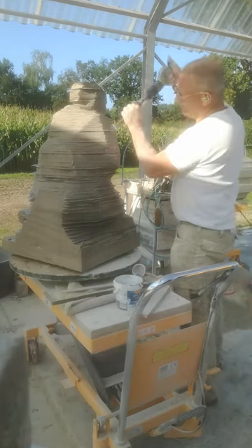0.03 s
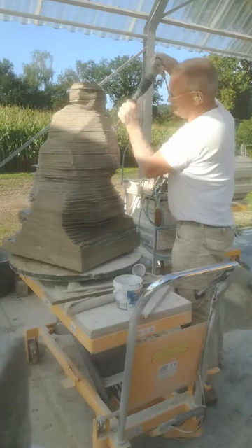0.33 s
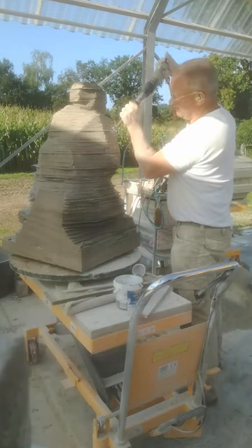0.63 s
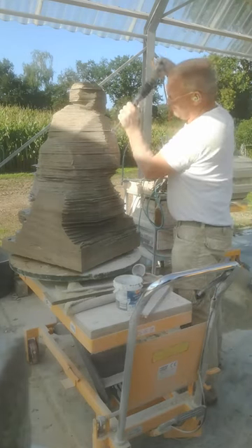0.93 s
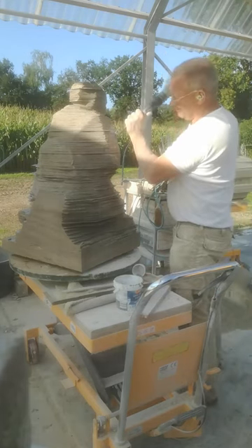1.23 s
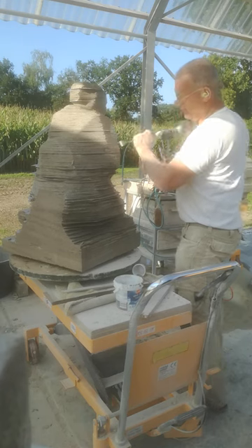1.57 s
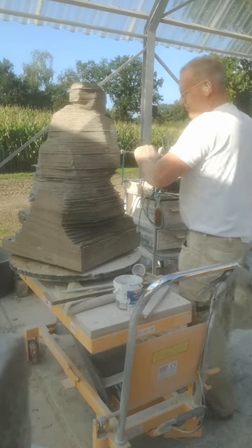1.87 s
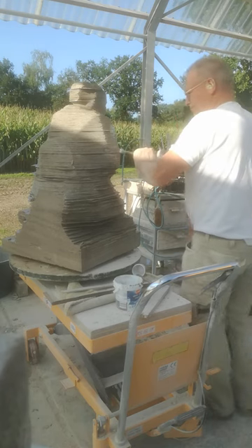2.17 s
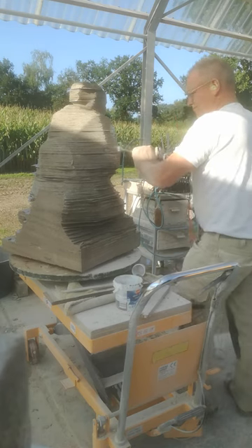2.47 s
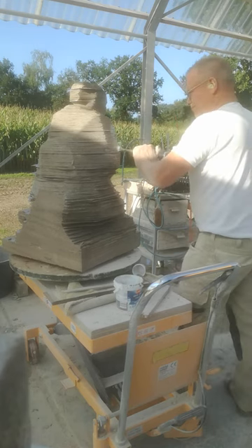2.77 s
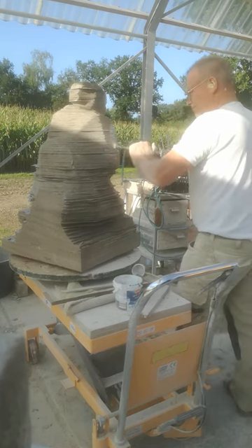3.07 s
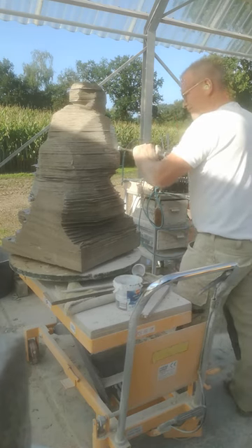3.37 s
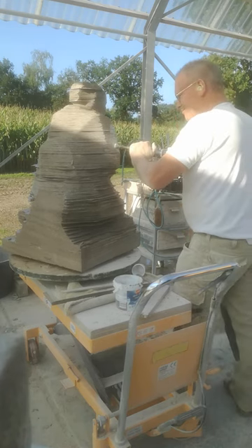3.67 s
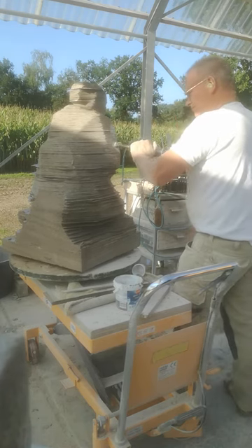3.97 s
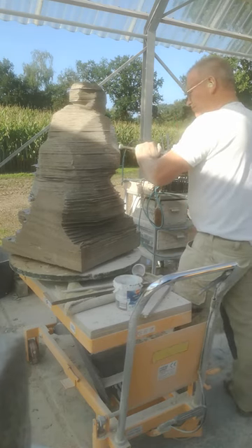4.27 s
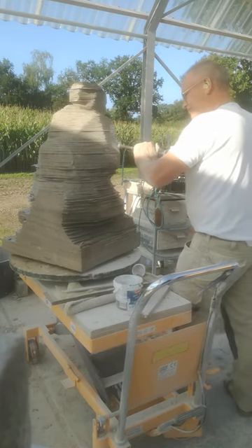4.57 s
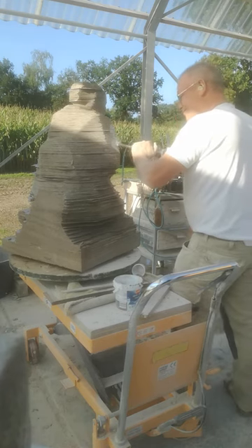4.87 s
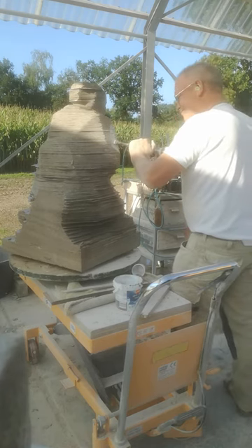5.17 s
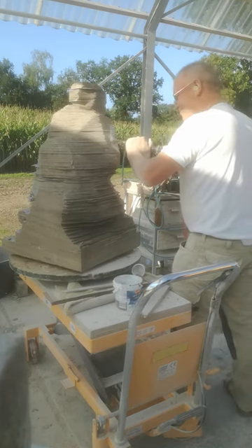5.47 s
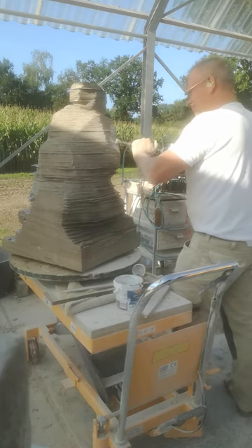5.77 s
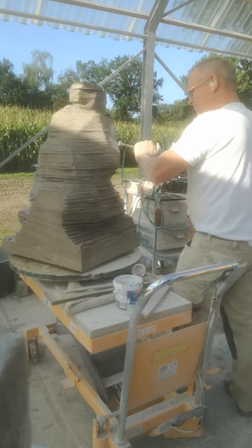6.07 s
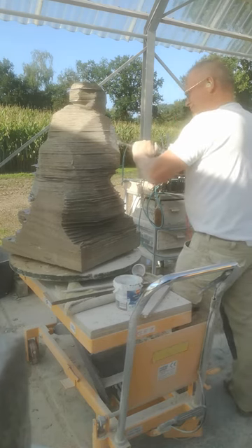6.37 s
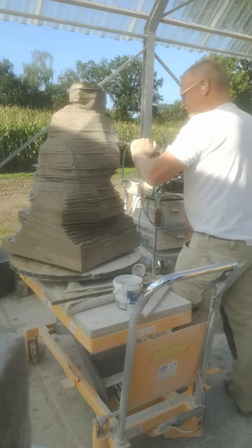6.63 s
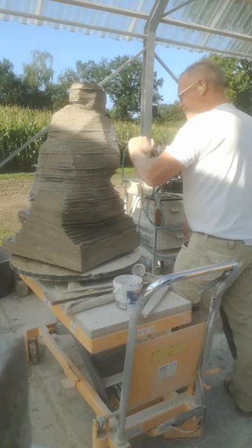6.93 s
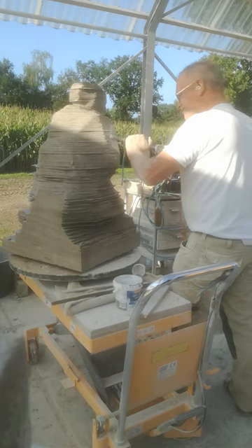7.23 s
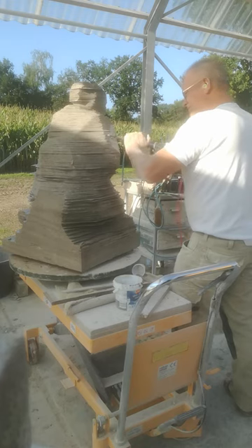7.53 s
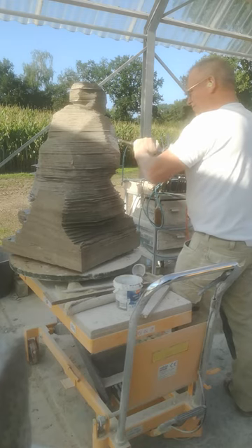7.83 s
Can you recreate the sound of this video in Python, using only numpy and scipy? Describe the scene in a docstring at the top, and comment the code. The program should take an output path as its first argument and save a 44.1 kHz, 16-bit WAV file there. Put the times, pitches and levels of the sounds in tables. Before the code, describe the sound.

A pneumatic chisel hammers stone in rapid, rattling bursts. Bright gritty cracks and a thin steel ring ride on a low thudding buzz, with hiss and a high whistle from the exhaust. Early short bursts give way to a few loose ringing taps and a pause, then longer runs follow, slowing as each ends. The tool is nearby on the right, with short reflections from an open-sided shelter in a quiet yard.

```python
"""Under an open-sided roof in a quiet yard, a sculptor dresses stone with a pneumatic chisel, in bursts.
At full speed the piston strikes about 42 times a second: the stone cracks, the steel rings, and the
exhaust lets out a thump, a hiss and a short whistle. As the hand eases, the piston slows and the chisel
rings longer. The tool is to the right of a spaced microphone pair, with the shelter reflecting it."""
import sys
import numpy as np
from scipy import signal
from scipy.fft import rfft, irfft
from scipy.io import wavfile
from scipy.ndimage import uniform_filter1d

SR = 44100
rng = np.random.default_rng(int(sys.argv[2]) if len(sys.argv) > 2 else 0)


def wrap_up_sound(samples):
    """Save the sound to the file named by the first command line argument, as 16-bit audio."""
    columns = np.atleast_2d(samples).T
    # keep every value between -1 and 1, then stretch to whole-number steps
    tamed = np.clip(columns, -1, 1)
    steps = np.round(tamed * 32767).astype(np.int16)
    wavfile.write(sys.argv[1], SR, steps)


N = 348390
TIME, FREQS = np.arange(N) / SR, np.fft.rfftfreq(N, 1 / SR)
FULL_RATE, IDLE_RATE, LOOSE_RATE = 42.5, 17, 28  # strokes per s

# Piston speed through each burst, first blow to last: time_s, strokes_per_s
BURST_1 = [(0.099, 25.45), (0.19, 39.96), (0.358, 43.73), (0.498, 41.76), (0.549, 36.71), (0.617, 22.59)]
BURST_2 = [(0.685, 18.19), (0.752, 40.67), (0.801, 41.19), (0.92, 43.29), (0.991, 41.93), (1.073, 30.85)]
BURST_3 = [(1.805, 21.94), (1.851, 21.89), (1.899, 19.3), (2.09, 33.11), (2.232, 37.12), (2.381, 43.14),
           (2.452, 42.95), (2.638, 32.29)]
BURST_4 = [(2.666, 37.54), (2.767, 41.95), (3.001, 43.53), (3.112, 28.9)]
BURST_5 = [(3.207, 28.59), (3.234, 42.51), (3.776, 42.44), (3.8, 43.06), (3.848, 39.46), (3.95, 19.18),
           (4.0, 20.91), (4.101, 18.92)]
BURST_6 = [(4.268, 7.97), (4.331, 23.81), (4.365, 35.19), (4.471, 40.18), (4.616, 42.6), (4.639, 42.24),
           (5.489, 42.47), (5.585, 41.47), (5.679, 21.97)]
BURST_7 = [(6.037, 17.5), (6.124, 28.97), (6.154, 34.65), (6.341, 40.33), (6.437, 42.56), (6.791, 42.26),
           (7.428, 42.57), (7.453, 40.16), (7.55, 20.93)]
BURSTS = [BURST_1, BURST_2, BURST_3, BURST_4, BURST_5, BURST_6, BURST_7]


def amp(db):
    """Decibels to gain."""
    return 10 ** (np.asarray(db) / 20)


def unit_rms(x):
    """Scales to rms 1."""
    return x / np.sqrt(np.mean(x ** 2) + 1e-20)


def curve_at(points, hz):
    """Reads a curve on a log-frequency axis."""
    point_hz, value = np.transpose(points)
    return np.interp(np.log(hz + 1), np.log(point_hz), value)


def rate_at(burst, t):
    """Strokes per second at the times t."""
    return np.interp(t, *np.transpose(burst))


def equalise(x, eq):
    """Filters by an EQ curve."""
    return irfft(rfft(x) * amp(curve_at(eq, FREQS)), N)


def noise(eq):
    """Noise of rms 1, shaped by an EQ curve."""
    return unit_rms(equalise(rng.standard_normal(N), eq))


def clicks(times, sizes):
    """One impulse at each time."""
    return np.bincount(np.clip(np.round(times * SR).astype(int), 0, N - 1), sizes, N)


def convolve(x, response):
    """Convolves and keeps the scene's length."""
    return signal.oaconvolve(x, response)[:N]


def add(mix, start_s, sound):
    """Mixes a sound in at start_s."""
    part = mix[max(round(start_s * SR), 0):][:len(sound)]
    part += sound[:len(part)]


def strokes():
    """Time and rate of each piston stroke: one blow for every whole turn of the cycle."""
    rows = []
    for burst in BURSTS:
        t = np.arange(burst[0][0], burst[-1][0] + .01, 1 / SR)
        rate = rate_at(burst, t)
        turns = np.floor(np.cumsum(rate) / SR)
        hit = np.diff(turns, prepend=-1) > 0
        rows.append([t[hit], rate[hit]])
    times, rates = np.hstack(rows)
    return times + .0002 + .00012 * rng.standard_normal(len(times)), rates


def performance(t, rates, open_db_per_s=904.5, shut_db_per_s=378.5, seat_db_per_s=229):
    """Levels and whistle pitch at the times t, following the sculptor's grip and the piston's speed."""
    # Each grip on the tool, with relative levels at full speed: air_on_s, seated_s, eases_s, air_off_s,
    # air_db, thump_db, first_bite_db, last_bite_db, first_ring_db, last_ring_db, whistle_db, whistle_hz
    grips = [(0.052, 0.135, 0.55, 0.58, -38, -41.5, -34.5, -44.5, -30.5, -33.5, -23, 7760),
             (0.656, 0.726, 1.1, 1.068, -38.5, -43, -39.5, -41, -36.5, -29, -24.5, 8120),
             (1.3, 1.303, 1.36, 1.4, -42, -44.5, -46, -46, -34, -33, -36, 8300),
             (1.776, 1.8, 1.8, 2.07, -42.5, -48, -66, -49.5, -48, -42, -35, 7900),
             (1.956, 1.98, 2.9, 2.5, -40.5, -43.5, -49.5, -39.5, -42.5, -37, -32.5, 6340),
             (2.62, 2.62, 3.3, 3.143, -40, -45.5, -41.5, -45.5, -40, -35.5, -28.5, 7860),
             (3.199, 3.24, 3.8, 3.96, -41, -45, -43, -39.5, -42.5, -36, -28.5, 7930),
             (3.9, 3.93, 4.6, 4.11, -38, -45, -46, -48.5, -44, -47.5, -30.5, 8000),
             (4.25, 4.347, 5.57, 5.65, -39.5, -45, -45, -41.5, -44.5, -36, -26.5, 7750),
             (6.049, 6.116, 8.5, 7.55, -39.5, -45, -43.5, -41, -43, -33, -28, 7750)]
    grips = np.array(grips)
    throttle_db = np.minimum((t - grips[:, :1]) * open_db_per_s, (grips[:, 3:4] - t) * shut_db_per_s)
    open_db = np.minimum(throttle_db.max(0), 0)
    (on_s, seated_s, eases_s, off_s, air_db, thump_db, first_bite_db, last_bite_db,
     first_ring_db, last_ring_db, whistle_db, whistle_hz) = grips[throttle_db.argmax(0)].T
    progress = np.clip((t - on_s) / (off_s - on_s), 0, 1)
    rates = np.maximum(rates, IDLE_RATE)

    def slow_loss(spin_up_db, easing_db):
        """Level lost to a slow piston: this many dB each time the rate halves."""
        return np.log2(FULL_RATE / rates) * np.where(t < eases_s, spin_up_db, easing_db)

    seat_db = np.minimum(t - seated_s, 0) * seat_db_per_s  # blows fall short until the chisel is seated
    boom_db = 3 * np.exp(-((rates - 37.1) / 2.96) ** 2)  # the body booms near 37 strokes per s
    swell_db = 5.5 * (np.sin(np.pi * progress) - 1)  # the whistle swells in mid-cut
    squeak_db = 5.5 * (t < seated_s)  # and squeaks on the first puffs
    bite_db = first_bite_db + (last_bite_db - first_bite_db) * progress
    ring_db = first_ring_db + (last_ring_db - first_ring_db) * progress ** 1.3
    return dict(air_db=air_db + open_db - slow_loss(5.5, 5),
                thump_db=thump_db + open_db + seat_db + boom_db - slow_loss(5.5, 5.5),
                bite_db=bite_db + seat_db - slow_loss(1.5, 2.5),
                ring_db=ring_db + seat_db - slow_loss(1.5, 3),
                whistle_db=whistle_db + open_db + swell_db + squeak_db - slow_loss(10, 32.5),
                whistle_hz=np.maximum(whistle_hz * (rates / FULL_RATE) ** .75, 4960))


def yard_ambience(gain_db=-80):
    """A faint, low bed of outdoor noise, mostly common to both microphones."""
    # Tone of the yard: freq_hz, level_db
    yard_eq = [(25, -3), (90, 3.5), (160, 6.5), (300, -11.5), (700, -11.5), (1600, -24.5), (4000, -15),
               (9000, -17), (16000, -18.5)]
    return amp(gain_db) * (noise(yard_eq) + .5 * np.array([noise(yard_eq), noise(yard_eq)]))


def air_hiss(times, air_db, leak_limit_db=-50, puff_s=0.0084, gain_db=1):
    """A small flow only leaks past the piston; a larger one leaves the exhaust in puffs."""
    # Peaky hiss of the leak: freq_hz, level_db
    leak_eq = [(100, 8.5), (250, 16.5), (560, -5), (740, 15), (950, 1.5), (1250, 9), (2200, -25),
               (3100, 6.5), (4300, -15), (5800, 11), (7900, -10), (9000, 12.5), (11000, -12.5),
               (16000, -29)]
    # Broad hiss of the exhaust: freq_hz, level_db
    exhaust_eq = [(30, -30), (100, -23), (220, -6.5), (500, -11), (900, -12), (1600, -4), (2200, -6),
                  (3000, -2), (3900, 0), (4800, -2.5), (6800, 1), (9500, -3), (12000, -4), (16000, -21.5)]
    t = np.arange(2048) / SR
    puff = t / puff_s * np.exp(1 - t / puff_s) ** 2
    pulsing = 1 + convolve(clicks(times, np.ones(len(times))), puff)
    flow, limit = amp(air_db), amp(leak_limit_db)
    leak_share = limit / np.hypot(flow, limit)
    leak = leak_share * noise(leak_eq)
    exhaust = (1 - leak_share) * pulsing * noise(exhaust_eq)
    return amp(gain_db) * flow * (leak + exhaust)


def valve_putter(times, air_db, rates, pitch_hz=745, t60_s=0.03, open_db=-49, gain_db=-34, lead_s=.024):
    """A hollow putter as the piston draws back before every stroke, strongest when it idles."""
    t = np.arange(3000) / SR
    envelope = amp(-60 * t / t60_s) * (1 - np.exp(-t / 0.00033))
    pop = envelope * np.sin(2 * np.pi * pitch_hz * t)
    late_s = 0.0027 * rng.random(len(times))
    sizes = amp(np.minimum(air_db - open_db, 0)) * np.minimum(22 / rates, 1) ** 3
    return amp(gain_db) * convolve(clicks(times - lead_s + late_s, sizes), pop)


def stone_crack(times, bite_db, crack_s=0.0011, crumble_s=0.0074, crumble_db=-13, knock_db=-11, gain_db=24):
    """Each blow is a knock that is always alike, a fresh crack, and a short crumbling of grit."""
    # Bright snap of breaking stone: freq_hz, level_db
    crack_eq = [(150, -41), (700, -9.5), (1800, -11), (3000, -2.5), (4600, -2), (5600, 6), (7000, 8),
                (9000, 1.5), (12000, -8), (13200, -3), (16000, -10.5)]
    t = np.arange(2048) / SR
    blows = clicks(times, amp(bite_db))
    crack = np.sqrt(t / crack_s) * np.exp(.5 - t / crack_s)
    crumble = amp(crumble_db) * np.exp(-t / crumble_s)
    fracture = convolve(blows, crack + crumble) * rng.standard_normal(N)
    knock = convolve(blows, crack * rng.standard_normal(len(t)))
    return amp(gain_db) * equalise(fracture + amp(knock_db) * knock, crack_eq)


def steel_ring(times, ring_db, looseness, pressed_hz=10900, free_hz=10810,
               pressed_s=0.00079, free_s=0.012, rebound_gain=0.028, gain_db=-3):
    """The chisel's lengthwise mode: damped when pressed on the stone, lower and longer when loose."""
    out, t = np.zeros(N), np.arange(6000) / SR
    attack = 1 - np.exp(-t / 0.00045)
    for start_s, level_db, loose in zip(times, ring_db, looseness):
        detune, phase = rng.standard_normal(2)
        pitch_hz = free_hz + (1 - loose) * (pressed_hz - free_hz + 70 * detune)
        decay_s = pressed_s * (free_s / pressed_s) ** loose
        struck = np.exp(-t / decay_s) * np.sin(2 * np.pi * (pitch_hz * t + phase))
        rebound = rebound_gain * np.exp(-t / free_s) * np.sin(2 * np.pi * (free_hz * t + phase))
        add(out, start_s, amp(level_db + gain_db) * unit_rms((struck + rebound) * attack))
    return out


def piston_thump(times, thump_db, rates, return_gain=0.096, lag_s=.001, gain_db=28):
    """The forward and the weaker return stroke each push a puff of air through the tool's body."""
    # Modes of the tool body and exhaust chamber: pitch_hz, level_db, t60_s
    body_modes = [(39.3, -28.5, 0.31), (159.3, 1, 0.15), (215.2, -2.5, 0.076), (249, -0.5, 0.074),
                  (314, -4, 0.15), (337.2, -4.5, 0.15), (417, -6.5, 0.053), (468.2, -8, 0.07),
                  (550, -12, 0.072), (643, -6.5, 0.15), (1014, -10, 0.018), (1562, -6.5, 0.053),
                  (1981, -14, 0.045)]
    t = np.arange(8000) / SR
    sizes = amp(thump_db + .5 * rng.standard_normal(len(times)))
    sizes *= (42 / np.maximum(rates, 25)) ** 0.33  # slow strokes are longer
    puffs = clicks(times + lag_s, sizes) + clicks(times + lag_s + .5 / rates, return_gain * sizes)
    # neighbouring modes swing in opposite directions, so the thump swells instead of clicking
    body = sum((-1) ** k * amp(db - 60 * t / t60_s) / t60_s * np.sin(2 * np.pi * hz * t)
               for k, (hz, db, t60_s) in enumerate(body_modes))
    return amp(gain_db) * convolve(puffs, body / np.linalg.norm(body))


def port_whistle(times, whistle_db, whistle_hz, rates,
                 peak_s=.004, sag_hz=550, detune_hz=130, flutter_hz=230, gain_db=-6):
    """After each blow the exhaust port opens and sings a falling chirp, longer when the piston is slow."""
    out, t = np.zeros(N), np.arange(1800) / SR
    for start_s, level_db, rate, centre_hz in zip(times, whistle_db, rates, whistle_hz):
        late, detune, accent = rng.standard_normal(3)
        rise_s = peak_s * np.exp(0.2 * late) * (42 / max(rate, 26)) ** 1.3
        opening = t / rise_s
        flow = (opening * np.exp(1 - opening)) ** 3
        flutter = unit_rms(uniform_filter1d(rng.standard_normal(len(t)), 30))
        sag = np.minimum(opening, 4) - 1.3
        pitch_hz = centre_hz + detune_hz * detune - sag_hz * sag + flutter_hz * flutter
        chirp = unit_rms(flow * np.sin(2 * np.pi * np.cumsum(pitch_hz) / SR))
        add(out, start_s, amp(level_db + gain_db + 1.1 * accent) * chirp)
    return out


def handling():
    """Faint scuffs and clinks as the sculptor shifts his stance and grip."""
    # Small moves in the pauses: start_s, level_db, centre_hz, width_hz, rise_s, decay_s
    scuffs = [(1.538, -58, 1800, 694, 0.028, 0.026), (1.55, -63.5, 3240, 1800, 0.016, 0.021),
              (5.908, -48.5, 3880, 140, 0.0022, 0.003), (5.907, -60, 2160, 600, 0.0024, 0.022),
              (5.943, -63.5, 1367, 1430, 0.0098, .03), (7.784, -52.5, 7120, 7940, 0.00068, 0.00054)]
    out, t, hz = np.zeros(N), np.arange(16384) / SR, np.fft.rfftfreq(16384, 1 / SR)
    for start_s, level_db, centre_hz, width_hz, rise_s, decay_s in scuffs:
        band = 1 / (1 + (2 * (hz - centre_hz) / width_hz) ** 2)
        scuff = unit_rms(irfft(rfft(rng.standard_normal(len(t))) * band))
        envelope = np.minimum(t / rise_s, 1) * np.exp(-np.maximum(t - rise_s, 0) / decay_s)
        add(out, start_s, amp(level_db) * scuff * envelope)
    return out


def shelter_reverb(send, return_eq, predelay_s=.003, sway_hz=.9):
    """Sparse reflections from stone, floor and roof; their pattern shifts as the sculptor sways."""
    # Reverb time under the roof: freq_hz, t60_s
    decay_times = [(150, 0.34), (1000, 0.3), (4000, 0.34), (8000, 0.25), (15000, 0.13)]
    out, length = np.zeros(N), SR // 2
    for k in range(3):
        taps = rng.standard_normal(length) * (rng.random(length) < .1)
        taps *= np.arange(length) > predelay_s * SR
        hz, t, spectrum = signal.stft(taps, SR, nperseg=256)
        fade = amp(-60 * t / curve_at(decay_times, hz)[:, None])
        tail = signal.istft(spectrum * fade, SR, nperseg=256)[1]
        crossfade = np.sqrt(2 / 3) * np.cos(2 * np.pi * (sway_hz * TIME + k / 3))  # equal power
        out += convolve(send * crossfade, tail / np.linalg.norm(tail))
    return equalise(out, return_eq)


def microphone_pair(direct, send, left_lag_samples=22):
    """The left microphone hears the tool later and duller; each picks up its own reflections."""
    # Shading of the left microphone from the tool: freq_hz, gain_db
    shade_eq = [(200, 0.5), (1200, 0), (2200, -21.5), (4000, -17.5), (8000, -22.5), (11000, -35),
                (15000, -13.5)]
    # Tone of the reflections on each side: freq_hz, gain_db
    left_reverb_eq = [(150, -24), (500, -4), (1200, 5), (4000, -1.5), (8000, -7.5), (11000, 1),
                      (15000, 2.5)]
    right_reverb_eq = [(150, -28), (500, 1.5), (1200, -0.5), (4000, 4), (8000, 0.5), (15000, 2)]
    delayed = np.r_[np.zeros(left_lag_samples), direct[:-left_lag_samples]]
    left = equalise(delayed, shade_eq) + shelter_reverb(send, left_reverb_eq)
    right = direct + shelter_reverb(send, right_reverb_eq)
    return np.array([left, right])


def scene(blow_send_db=-6, whistle_send_db=-3, valve_send_db=-11, air_direct_db=-4):
    """The chisel faces the microphones; the exhaust points away and is heard more off the shelter."""
    # Single blows of the chisel held loosely: start_s, bite_db, ring_db
    loose_blows = [(1.106, -71.5, -46), (1.139, -59, -41.5), (1.281, -75.5, -73), (1.309, -53.5, -34.5),
                   (1.343, -42, -34.5), (1.372, -39, -30.5), (1.385, -71.5, -23.5), (1.452, -55, -42)]
    loose_times, loose_bite_db, loose_ring_db = np.transpose(loose_blows)
    cut_times, cut_rates = strokes()
    cutting = performance(cut_times, cut_rates)
    force_db = 0.65 * rng.standard_normal(len(cut_times))  # no two blows bite alike
    cut_looseness = np.clip((41 - cut_rates) / 16, 0, 1)  # the piston slows as the hand eases off

    times = np.r_[cut_times, loose_times]
    rates = np.r_[cut_rates, np.full(len(loose_times), LOOSE_RATE)]
    bite_db = np.r_[cutting["bite_db"] + force_db, loose_bite_db]
    ring_db = np.r_[cutting["ring_db"] + force_db, loose_ring_db]
    looseness = np.r_[cut_looseness, np.ones(len(loose_times))]
    tool = performance(times, rates)
    airflow_db = performance(TIME, rate_at(np.vstack(BURSTS), TIME))["air_db"]

    blows = stone_crack(times, bite_db) + steel_ring(times, ring_db, looseness)
    body = piston_thump(times, tool["thump_db"], rates) + handling()
    putter = valve_putter(times, tool["air_db"], rates)
    chirps = port_whistle(times, tool["whistle_db"], tool["whistle_hz"], rates)
    hiss = air_hiss(times, airflow_db)
    direct = blows + body + putter + chirps + amp(air_direct_db) * hiss
    send = (amp(blow_send_db) * blows + body + amp(valve_send_db) * putter
            + amp(whistle_send_db) * chirps + hiss)
    return microphone_pair(direct, send) + yard_ambience()


def record(dry, cutoff_hz=16000):
    """A steep low-pass trims the very top of the treble."""
    lowpass = signal.firwin(511, cutoff_hz, window=("kaiser", 9), fs=SR)
    return signal.oaconvolve(dry, lowpass[None], "same")


dry = scene()
out = record(dry)
wrap_up_sound(out)
```